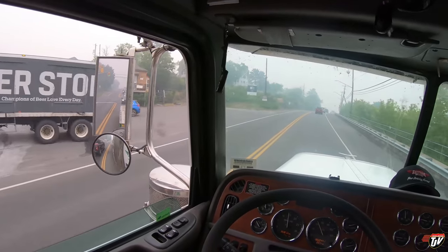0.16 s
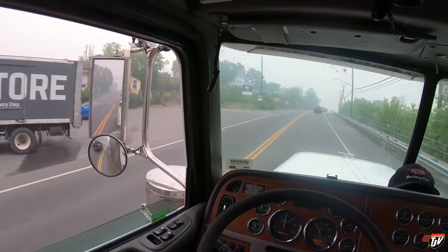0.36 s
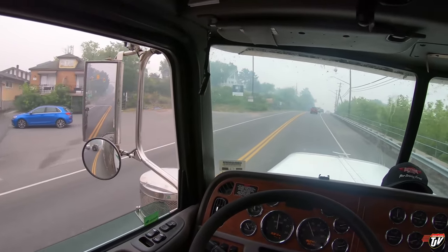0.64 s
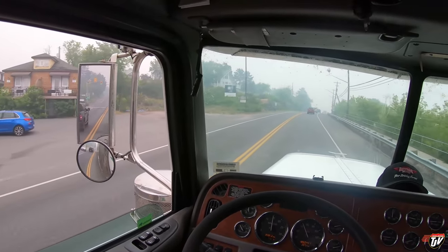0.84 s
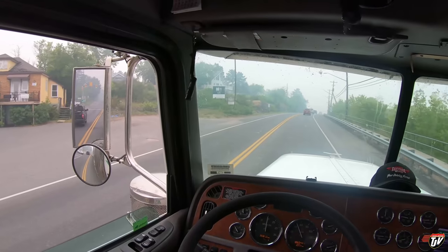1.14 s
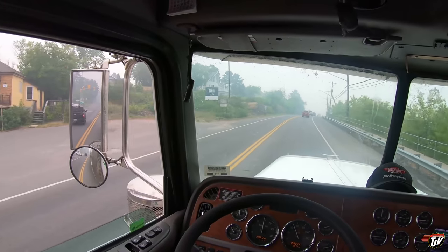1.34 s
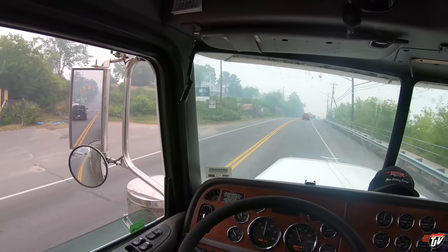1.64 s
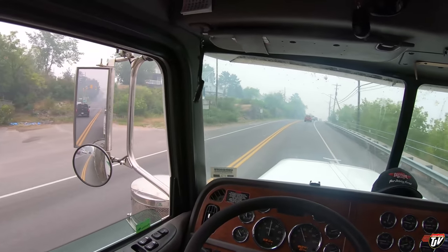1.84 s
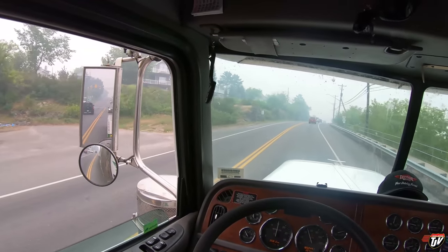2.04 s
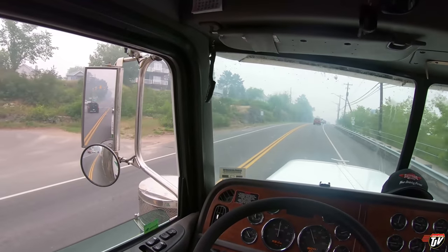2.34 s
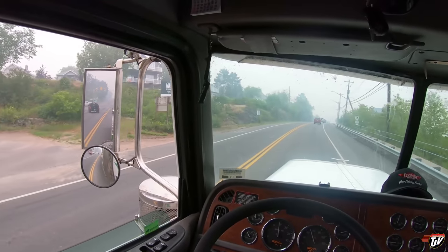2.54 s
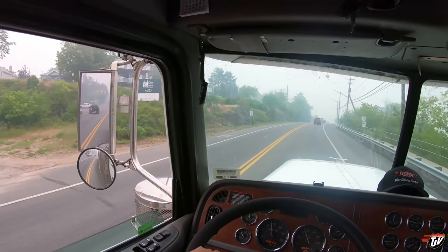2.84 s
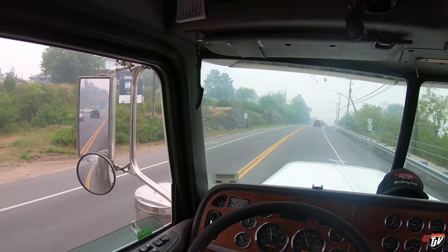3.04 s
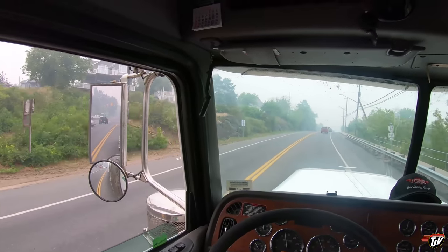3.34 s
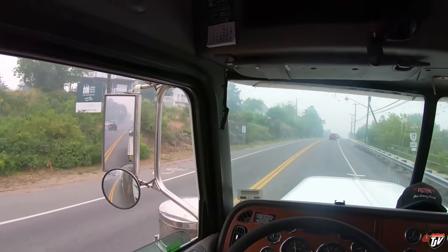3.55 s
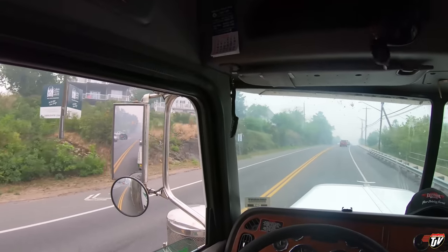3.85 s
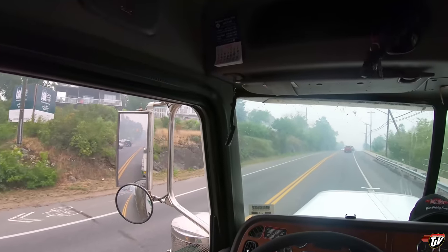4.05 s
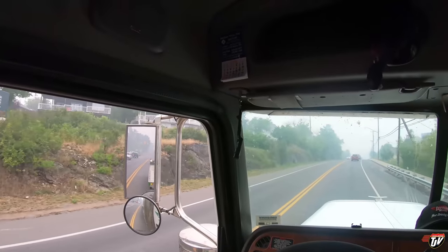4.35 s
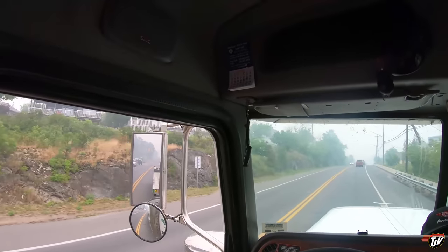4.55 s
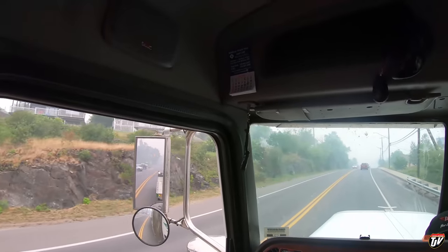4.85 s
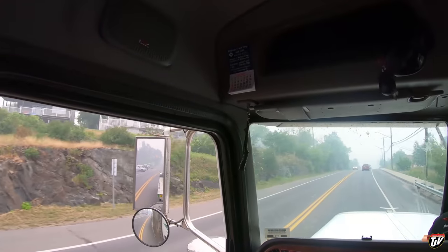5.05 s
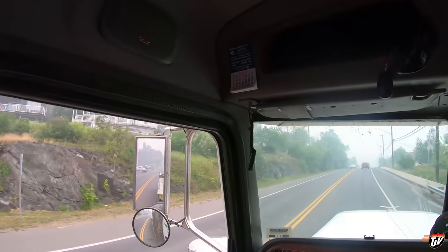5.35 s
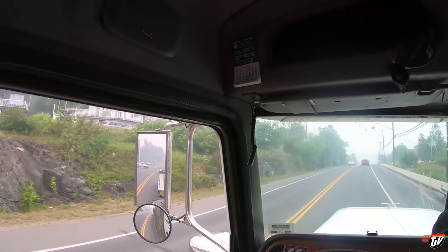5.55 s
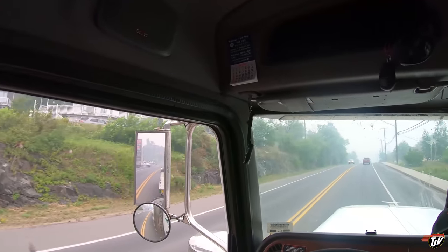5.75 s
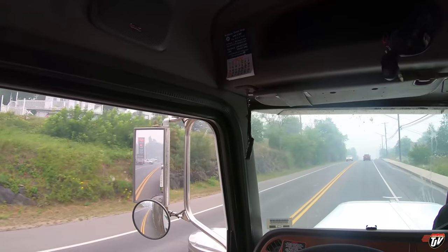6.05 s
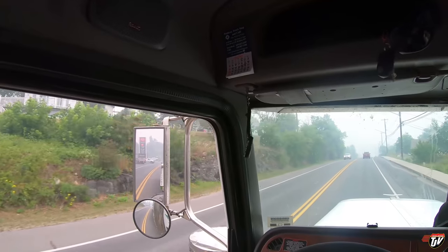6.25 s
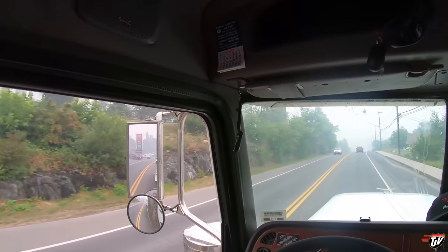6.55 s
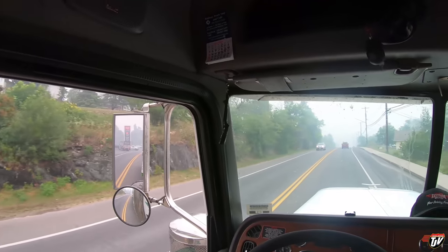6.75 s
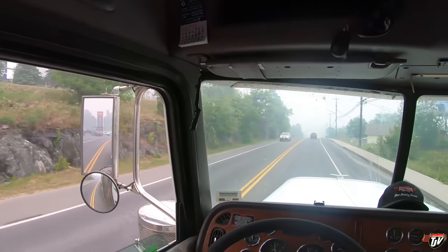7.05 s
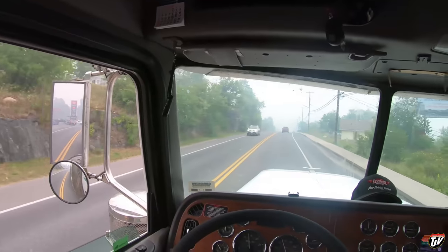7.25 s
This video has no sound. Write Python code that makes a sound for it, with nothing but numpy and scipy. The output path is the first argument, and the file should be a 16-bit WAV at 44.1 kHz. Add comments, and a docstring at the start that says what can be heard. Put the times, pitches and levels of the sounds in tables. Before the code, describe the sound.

Heard from inside a heavy truck's cab: a loud, boxy diesel drone climbs slightly over tyre and wind noise, with clatter and faint high turbo whistle. The driver lifts, the drone sinks, and loose low booms, panel shudder and tyre howl fill the coast. A soft lurch and grumble bring in the next gear, and the engine pulls on, deeper and gradually rising.

```python
"""Diesel truck cab through one upshift

Inside the cab of a six-cylinder diesel semi truck pulling along a road. The engine's drone is a sum of
crank orders, with firing noise over it; the turbo is a whistle whose pitch runs down after the lift.
While the truck coasts, filtered noise and wavering low tones make the cab shudder and boom.
Then the next gear takes the load with a deep boom. Tyres and wind are coloured noise throughout."""
import sys
import numpy as np
from scipy import signal
from scipy.fft import rfft, irfft, next_fast_len
from scipy.io import wavfile
from scipy.ndimage import uniform_filter1d, minimum_filter1d

SR = 44100
rng = np.random.default_rng(int(sys.argv[2]) if len(sys.argv) > 2 else 0)


def store_pcm(level_fs):
    """Save levels as 16-bit WAV."""
    pcm = np.round(np.clip(level_fs, -1, 1) * 32767).astype(np.int16)
    wavfile.write(sys.argv[1], SR, np.atleast_2d(pcm).T)


N = 325899
TIME = np.arange(N) / SR
FFT_SIZE = next_fast_len(N, True)
BINS = np.fft.rfftfreq(FFT_SIZE, 1 / SR)  # Hz

# The driver's foot: pull, lift, a little between the gears, pull again.
# Each row: time in seconds, throttle from 0 to 1.
THROTTLE = [(0, 0.92), (1.35, 0.96), (1.85, 0.73), (2.05, 0.49), (2.13, 0.3), (2.38, 0.08), (2.55, 0.08),
            (2.8, 0.28), (3.27, 0.22), (3.38, .5), (3.47, 0.8), (3.85, 0.88), (7.39, 0.79)]
# Spectrum of the cab's light fittings. Each row: frequency in Hz, relative density in dB per Hz.
FITTINGS_COLOUR = [(1500, -16), (3500, 10), (5500, 1.5), (8000, 4), (9500, -20), (12000, -9.5), (15000, -4)]

CRUISE = 25  # crank turns per second about which levels grow with the revs
CLUTCH_S = 3.37  # the clutch bites
# the driveline is slack from the lift until the next gear takes hold
SLACK_FROM_S, SLACK_TO_S, SLACK_IN_S, SLACK_OUT_S = 1.7, 3.56, 0.13, 0.34
# road noise swells slowly and dies quickly, then eases after the shift
SWELL_S, SWELL_RISE_S, SWELL_FALL_S = 3.545, 0.5, 0.37
EASE_S, EASE_LENGTH_S = 3.6, 0.61


def gain_of(db):
    """Converts level to linear amplitude: 20 dB for each factor of ten."""
    return 10 ** (np.asarray(db) / 20)


def evened(x):
    """Normalises signal power, giving an rms of one."""
    return x / np.sqrt(np.mean(x ** 2) + 1e-20)


def curve(rows, axis=1):
    """Linear interpolation of one column of a control table, at every sample."""
    columns = np.transpose(rows)
    return np.interp(TIME, columns[0], columns[axis])


def read(points, hz):
    """Interpolates a spectrum table in dB along a logarithmic frequency axis."""
    f, value = np.transpose(points)
    return np.interp(np.log(hz + 1), np.log(f + 1), value)


def noise(gains):
    """Spectral shaping: white noise weighted in each frequency bin, then set to an rms of one."""
    spectrum = rfft(rng.standard_normal(FFT_SIZE)) * gains
    return evened(irfft(spectrum, FFT_SIZE)[:N])


def band(width_hz):
    """Narrow-band modulation: slow noise that spreads a tone into a band of this half width."""
    return noise(1 / (1 + (BINS / width_hz) ** 2))


def wander(rate_hz):
    """Slow random drift: straight lines between normally distributed knots of unit deviation."""
    knots = np.arange(0, N / SR + 1, 1 / rate_hz)
    return np.interp(TIME, knots, rng.standard_normal(len(knots)))


def ramp(middle_s, length_s):
    """A linear fade from zero to one, centred on a moment."""
    return np.clip(.5 + (TIME - middle_s) / length_s, 0, 1)


def bell(x, width):
    """A Gaussian hump of height one around zero, down to 1/e at the width."""
    return np.exp(-(x / width) ** 2)


def cab_gain(hz):
    """Room resonance: the cab's standing waves raise or lower the level near their own frequencies."""
    # Each row: centre in Hz, half width in Hz, peak gain in dB.
    cab_modes = [(317.4, 25, 7.5), (408, 32, -4), (446, 18, 6.5), (690, 23, 6.5), (788, 24, -6),
                 (1020, 55, 1.5)]
    grid = np.arange(1500)
    db = sum(peak_db * bell(grid - centre, width) for centre, width, peak_db in cab_modes)
    return np.interp(hz, grid, gain_of(db))


def slack():
    """Driveline unloading: one while the driveline is slack, zero in gear."""
    return ramp(SLACK_FROM_S, SLACK_IN_S) - ramp(SLACK_TO_S, SLACK_OUT_S)


def shudder_gain():
    """Panel vibration amplitude: faint under load, building for as long as the driveline is slack."""
    base_db, slack_db, growth_db_per_s = -39, 14.5, 1.5
    return gain_of(base_db + slack() * (slack_db + growth_db_per_s * (TIME - SLACK_FROM_S)))


def crank_speed():
    """Gear ratios set crank speed: it climbs in each gear and falls between them, with a brief flare."""
    # Crank speed in the lower and the higher gear. Each row: time in seconds, turns per second.
    low_gear = [(0, 23.88), (0.9, 24.8), (1.6, 25.3), (2.05, 25.36)]
    high_gear = [(3.5, 20.8), (4.1, 20.91), (5.3, 21.41), (6.1, 21.96), (7.39, 22.81)]
    run_down_s, flare, flare_s = .5, .8, .08  # flare in turns per second
    matched = (low_gear[-1][0] + run_down_s, high_gear[0][1])
    speed = curve([*low_gear, matched, *high_gear])
    return speed + flare * bell(TIME - CLUTCH_S, flare_s)


def pull_db(speed):
    """Load dependence: throttle sets the low orders; the upper ones also grow with the revs."""
    throttle = np.maximum(curve(THROTTLE), 1e-3)
    full_db, shut_loss_db, db_per_rev = 0.56, 15, 1.08
    # a grumble as the clutch bites
    grumble_db, grumble_s = 8.5, 0.12
    grumble = grumble_db * bell(TIME - (CLUTCH_S - grumble_s / 2), grumble_s)
    low_db = 20 * np.log10(throttle)
    upper_db = full_db - shut_loss_db * (1 - throttle) + db_per_rev * (speed - CRUISE) + grumble
    return low_db, upper_db


def road(gust_db=0.83, boxiness=0.43):
    """Broadband flow and contact noise: tyres and wind coloured by the cab, over chassis rumble."""
    # Tyres and wind. Each row: frequency in Hz, relative density in dB per Hz.
    road_colour = [(120, -8), (200, -5), (280, -6), (360, -7.5), (470, -8), (600, -3), (740, -3),
                   (1000, -8.5), (1300, -13.5), (2000, -19), (3500, -30), (5000, -37.5), (6500, -57),
                   (10000, -91)]
    # Chassis rumble. Each row: frequency in Hz, relative density in dB per Hz.
    rumble_colour = [(8, -19.5), (18, -9.5), (27, -6), (36, -3), (48, -4), (65, -10.5), (100, -11.5),
                     (160, -14), (240, -33), (400, -77)]
    roar_base_db, swell_db, rumble_base_db, rumble_ease_db = -33.5, 3, -25, -5.5
    # after the shift the roar sinks, then creeps back as the truck gathers speed
    lull_db, creep_db_per_s = -3.5, 0.71
    eased = ramp(EASE_S, EASE_LENGTH_S)
    swell = bell(TIME - SWELL_S, np.where(TIME < SWELL_S, SWELL_RISE_S, SWELL_FALL_S))
    roar_db = roar_base_db + swell_db * swell + eased * (lull_db + creep_db_per_s * (TIME - EASE_S))
    colour = gain_of(read(road_colour, BINS)) * cab_gain(BINS) ** boxiness
    roar = gain_of(roar_db + gust_db * wander(12)) * noise(colour)
    rumble = noise(gain_of(read(rumble_colour, BINS)))
    return roar + gain_of(rumble_base_db + rumble_ease_db * eased) * rumble


def howl(swell_db=5):
    """Modal filtering: tyre noise howls in the cab's middle modes while coasting, with a narrow moan."""
    howl_hz, howl_width_hz, howl_db = 586, 274, -40.5
    moan_hz, moan_width_hz, moan_s, moan_db = 727, 30, .8, -42
    howl_mode = 1 / (1 + ((BINS - howl_hz) / howl_width_hz) ** 4)
    moan_mode = 1 / (1 + ((BINS - moan_hz) / moan_width_hz) ** 2)
    moan = gain_of(moan_db) * bell(TIME - SWELL_S, moan_s) * noise(moan_mode)
    level = gain_of(howl_db + swell_db * bell(TIME - SWELL_S, SWELL_RISE_S))
    # the howl stops as the roar eases
    coasting = ramp(SLACK_FROM_S, SLACK_IN_S) - ramp(EASE_S, EASE_LENGTH_S)
    return moan + level * coasting * noise(howl_mode)


def shudder():
    """Resonance under random excitation: road shocks, as steady noise, drum one low panel mode."""
    panel_hz, panel_width_hz = 92.5, 34
    mode = 1 / (1 + ((BINS - panel_hz) / panel_width_hz) ** 2) ** 2
    return shudder_gain() * noise(mode)


def rattles(rise=0.0018, t60=0.084):
    """Impact with exponential decay: short, dry chinks from loose fittings (times in seconds)."""
    # Each row: start in seconds, level in dB before the soft onset.
    chinks = [(1.631, -44.5), (3.061, -57), (3.154, -64)]
    envelope = np.zeros(N)
    for s, db in chinks:
        age = np.maximum(TIME - s, 0)
        envelope += gain_of(db - 60 * age / t60) * (1 - np.exp(-age / rise))
    return envelope * noise(gain_of(read(FITTINGS_COLOUR, BINS)))


def ticks(speed):
    """A Poisson-like train of decaying impacts: fittings tick at random while the revs are high."""
    per_s, floor_db, spread_db, t60_s = 12, -69, 4, 0.025
    hits = (rng.random(N) < per_s / SR) * (speed > CRUISE - 2)
    sizes = gain_of(floor_db + spread_db * np.minimum(rng.exponential(1, N), 2))
    decay = np.exp(-np.log(1000) / (t60_s * SR))
    envelope = signal.lfilter([1], [1, -decay], hits * sizes + 1e-20)
    return envelope * noise(gain_of(read(FITTINGS_COLOUR, BINS)))


def booms(wobble=0.016, lumpy=0.13):
    """Low cavity tones under random modulation: the slack driveline's booms, each at its own pitch."""
    # Each row: centre in seconds, half length in seconds, pitch in Hz, level in dB.
    swells = [(2.14, 0.035, 38, -24), (2.287, .06, 62, -24), (2.464, 0.065, 97, -22),
              (2.734, 0.13, 103, -20), (2.858, 0.06, 127, -17.5), (2.996, 0.1, 102, -16.5),
              (3.155, 0.11, 100, -18), (3.263, .05, 85, -21), (3.433, 0.15, 64, -25.5)]
    out = np.zeros(N)
    for s, length, hz, db in swells:
        angle = 2 * np.pi * np.cumsum(hz * (1 + wobble * wander(24.95))) / SR
        out += gain_of(db) * bell(TIME - s, length) * (1 + lumpy * wander(35)) * np.sin(angle)
    return np.sqrt(2) * out


def lurches():
    """Transient excitation: each change of load gives a soft low heave and a short groan."""
    # Each row: centre in seconds, half length in seconds, heave in dB, ringing in Hz, ringing in dB.
    load_changes = [(2.03, 0.083, -21, 176.8, -29), (3.348, 0.12, -21.5, 195, -30.5)]
    # The heave. Each row: frequency in Hz, relative density in dB per Hz.
    heave_colour = [(25, -8.5), (55, -6), (85, 0), (130, 7.5), (240, -5), (330, -22.5), (600, -74.5)]
    heave = noise(gain_of(read(heave_colour, BINS)))
    out = np.zeros(N)
    for s, length, db, hz, ring_db in load_changes:
        groan = np.sqrt(2) * np.sin(2 * np.pi * hz * TIME)
        out += bell(TIME - s, length) * (gain_of(db) * heave + gain_of(ring_db) * groan)
    return out


def shaft(level_db=-25, wobble=0.05, lumpy=0.25):
    """Once-per-turn vibration: the slack drive shaft throbs, wandering in pitch and coming in lumps."""
    shaft_speed = 36  # mean turns per second
    # from when the revs have fallen until the gear bites
    from_s, to_s, fade_s = 2.28, 3.3, 0.3
    turns = np.cumsum(shaft_speed * (1 + wobble * wander(15))) / SR
    tone = gain_of(level_db) * (1 + lumpy * wander(13)) * np.cos(2 * np.pi * turns)
    return np.sqrt(2) * (ramp(from_s, fade_s) - ramp(to_s, fade_s)) * tone


def gearbox(turns):
    """Gear-mesh tone: the loaded pair sings a blurred note locked to crank speed."""
    # Each row: start in seconds, end in seconds, fade in seconds, cycles per crank turn,
    # half width in Hz, level in dB.
    whines = [(-.3, 2.4, 0.18, 35.5, 35, -46.5), (4.9, 6.9, 1.1, 75, 109.2, -50.5)]
    out = np.zeros(N)
    for start, end, fade, mesh, width_hz, db in whines:
        angle = 2 * np.pi * mesh * turns
        note = band(width_hz) * np.cos(angle) + band(width_hz) * np.sin(angle)
        out += gain_of(db) * (ramp(start, fade) - ramp(end, fade)) * note
    return out


def turbo(width_hz=55, level_db=-3, core=.8, jitter_hz=11):
    """Rotor whistle: a frequency-modulated core in a band of rushing air; it runs down, then spools up."""
    # Each row: time in seconds, mean pitch in Hz.
    whistle_hz = [(0, 7000), (.5, 7090), (1.1, 7370), (1.55, 7490), (1.8, 7340), (2.08, 7020), (2.2, 6430),
                  (2.35, 5820), (2.71, 4750), (3.1, 4150), (4.3, 4340), (5.4, 4450), (7.39, 4630)]
    # Each row: time in seconds, level in dB before the overall level_db.
    whistle_db = [(0, -70), (.6, -71), (1.5, -69), (2.1, -75), (2.45, -78), (2.58, -65), (2.72, -62),
                  (2.82, -76), (3.9, -73), (4.3, -63), (5.4, -62), (6, -69), (7.39, -71.5)]
    angle = 2 * np.pi * np.cumsum(curve(whistle_hz) + jitter_hz * wander(40)) / SR
    whistle = (core + band(width_hz) / 2) * np.sin(angle) + band(width_hz) / 2 * np.cos(angle)
    return gain_of(curve(whistle_db) + level_db) * evened(whistle)


def clatter_db(speed):
    """First-order lag: level follows the revs, the throttle, and the boost that trails behind it."""
    base_db, db_per_rev = -44.5, 1.07
    shut_loss_db, boost_loss_db, boost_lag_s = 5, 12.5, 0.99
    shut = 1 - curve(THROTTLE)
    keep = np.exp(-1 / (boost_lag_s * SR))
    lost_boost = signal.lfilter([1 - keep], [1, -keep], shut)
    return base_db + db_per_rev * (speed - CRUISE) - shut_loss_db * shut - boost_loss_db * lost_boost


def clatter(speed, turns, depth=0.5, knock_share=0.19, uneven=.015, level_db=6):
    """Amplitude-modulated noise: a puff at each firing over the intake rush; cylinders differ in strength."""
    # Combustion and intake. Each row: frequency in Hz, relative density in dB per Hz.
    clatter_colour = [(150, -5), (300, 1), (450, -4), (650, 2.5), (1000, 3.5), (1400, 1.5), (1850, 0),
                      (2220, 0), (2600, -6), (3500, -5), (4050, -10.5), (4500, -11.5), (5300, -17),
                      (5800, -23), (6500, -23.5), (7500, -29), (8600, -43), (9700, -55), (12000, -56),
                      (15500, -71.5)]
    # six puffs a turn; the second value is the share of the firing interval gone by
    cylinder, since = np.divmod(6 * turns % 6, 1)
    strength = 1 + uneven * rng.standard_normal(size=6)
    puffs = strength[cylinder.astype(int)] * (1 + depth * np.exp(-since / knock_share))
    rush = noise(gain_of(read(clatter_colour, BINS)))
    return gain_of(clatter_db(speed) + level_db) * evened(puffs * rush)


def hollow(turns, level_db=-3.0, throb=0.17):
    """Cavity resonance: a rough, boxy roar in the cab's middle modes, throbbing once a crank turn."""
    hollow_hz, hollow_width_hz = 454, 106
    # Each row: time in seconds, level in dB before the overall level_db.
    roar_level = [(0, -36), (.25, -35), (.8, -34.5), (1.05, -33), (1.95, -32), (2.22, -44), (2.5, -39),
                  (2.9, -34.5), (3.4, -32.5), (3.65, -34), (3.8, -38.5), (4.3, -38.5), (4.6, -47),
                  (5.1, -47), (5.35, -36.5), (6.6, -36), (7.2, -35), (7.39, -34)]
    mode = 1 / (1 + ((BINS - hollow_hz) / hollow_width_hz) ** 4)
    beat = 1 + throb * np.cos(2 * np.pi * turns)
    return gain_of(curve(roar_level) + level_db) * beat * noise(mode * cab_gain(BINS) ** .5)


def growl(turns, level_db=-39, throb=0.97):
    """Periodic modulation of block noise, at each turn and each full two-turn cycle of the crank."""
    # Each row: frequency in Hz, relative density in dB per Hz.
    growl_colour = [(120, -16), (210, 10), (290, 1), (380, -7.5), (460, -7), (600, -10.5), (900, -10.5),
                    (1500, -21.5), (3000, -58)]
    beat = 1 + throb * (np.cos(2 * np.pi * turns) + np.cos(np.pi * turns))
    return gain_of(level_db) * beat * noise(gain_of(read(growl_colour, BINS)))


def rasp(speed, turns, ripple_db=7.0, count=110):
    """Harmonics through dense modes: upper orders and half orders swell and fade as they slide across."""
    # The cab's smooth colour. Each row: frequency in Hz, level in dB per order before ripple and load.
    rasp_colour = [(330, -66), (500, -55.5), (700, -62), (950, -62.5), (1500, -69), (2500, -74)]
    mode_hz = np.arange(0, 3000, 14)
    ripple = ripple_db * np.clip(rng.standard_normal(len(mode_hz)), -2, 2)
    cab = gain_of(read(rasp_colour, mode_hz) + ripple)
    out = np.zeros(N)
    for order in 15.5 + np.arange(count) / 2:
        angle = 2 * np.pi * ((order * turns + rng.random()) % 1)
        out += np.interp(order * speed, mode_hz, cab) * np.cos(angle.astype(np.float32))
    return np.sqrt(2) * out


def drone(speed, turns, load_db, upper_follow=2.3, flutter=0.12, shake=4, flutter_hz=18):
    """Fourier synthesis of crank orders: the sixth booms at low revs; upper ones follow load most."""
    # Each row: vibrations per two crank turns, then levels in dB at the four speeds below,
    # before load and cab resonance.
    order_levels = [(3, -37.5, -39, -35.5, -37.5), (4, -31.5, -26.5, -28, -26.5),
                    (6, -32.5, -31.5, -23, -18), (7, -43.5, -32.5, -43, -37), (8, -32, -28.5, -23.5, -22.5),
                    (9, -34.5, -25.5, -36.5, -29.5), (10, -30.5, -31, -18.5, -14.5),
                    (11, -33.5, -33.5, -43, -37.5), (12, -11.5, -11, -16, -17.5),
                    (13, -33.5, -34.5, -28.5, -31.5), (14, -23.5, -40.5, -29, -32),
                    (16, -33.5, -28.5, -31.5, -27.5), (18, -39.5, -37, -31, -30),
                    (20, -45.5, -37, -42.5, -44), (22, -41, -35, -39, -50.5),
                    (24, -41.5, -44.5, -37.5, -32), (26, -55.5, -52.5, -50, -47.5),
                    (28, -49, -41, -46.5, -48), (30, -49, -51.5, -44, -41.5), (36, -57.5, -63, -46.5, -47),
                    (38, -54, -52.5, -44, -40), (40, -58.5, -49.5, -51, -49), (44, -56.5, -51, -43, -39.5)]
    # Crank speeds of the four level columns, in turns per second.
    column_speeds = [21.1, 22.5, 24.2, 25.2]
    # frame and cab delay the low orders (cycles), the more the further they lie from the sixth
    spread, spread_skew, half_order_lag = .12, .02, .25
    out = np.zeros(N)
    # the orders waver most while the cab shudders
    unsteady = flutter + shake * shudder_gain()
    for cycles, *levels_db in order_levels:
        order = cycles / 2  # a four-stroke cycle lasts two turns
        follow = 1 if order < 10 else upper_follow
        level = gain_of(np.interp(speed, column_speeds, levels_db) + load_db * follow)
        # the low orders smear into a dense beat; the upper ones arrive scattered
        delay = rng.random()
        if order < 10:
            away = order - 6
            delay = spread * away ** 2 - spread_skew * away ** 3 + half_order_lag * (2 * order % 2)
        angle = 2 * np.pi * ((order * turns - delay) % 1)
        steadiness = .25 if order == 6 else 1  # the booming order wavers least
        waver = unsteady * steadiness * wander(flutter_hz)
        out += level * cab_gain(order * speed) * (1 + waver) * np.cos(angle.astype(np.float32))
    return np.sqrt(2) * out


def scene(hunt=0.0005):
    """Superposition: crank speed and load drive the engine tones; road and cab noises lie around them."""
    speed = crank_speed() * (1 + hunt * wander(10))
    turns = np.cumsum(speed) / SR
    load_db, upper_db = pull_db(speed)
    background = road() + howl() + shudder() + rattles() + ticks(speed)
    driveline = booms() + lurches() + shaft() + gearbox(turns)
    rough = gain_of(upper_db) * (rasp(speed, turns) + growl(turns))
    engine = drone(speed, turns, load_db) + rough + hollow(turns) + clatter(speed, turns) + turbo()
    return (background + driveline + engine)[None]


def record(dry, ceiling=0.55):
    """Peak limiting by a smoothed gain, then soft ends and a linear-phase low-pass filter."""
    edge_hz = 15600
    allowed = np.minimum(1, ceiling / (abs(dry[0]) + 1e-9))
    gain = uniform_filter1d(minimum_filter1d(allowed, size=1500), size=1500)
    gain = gain * signal.windows.tukey(N, .001)
    low_pass = signal.firwin(511, edge_hz, window=("kaiser", 9), fs=SR)
    return signal.oaconvolve(dry * gain, low_pass[None], "same")


dry = scene()
out = record(dry)
store_pcm(out)
```